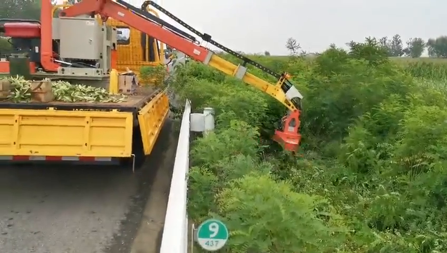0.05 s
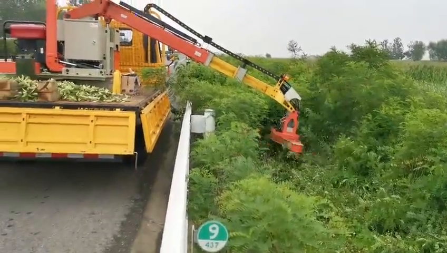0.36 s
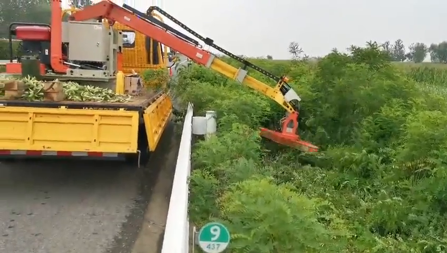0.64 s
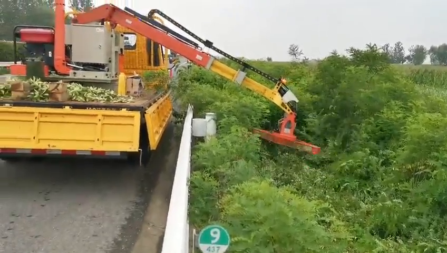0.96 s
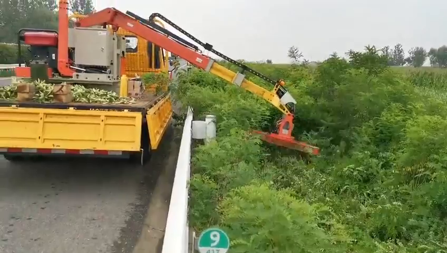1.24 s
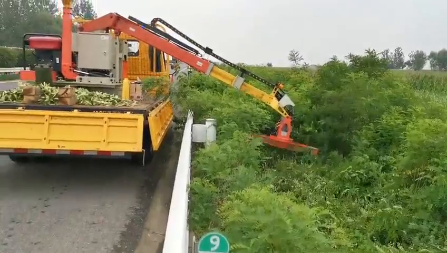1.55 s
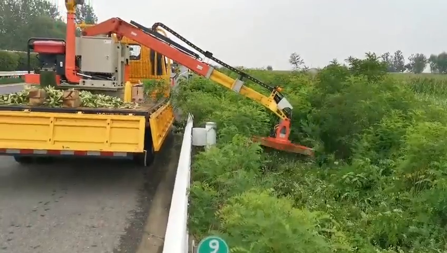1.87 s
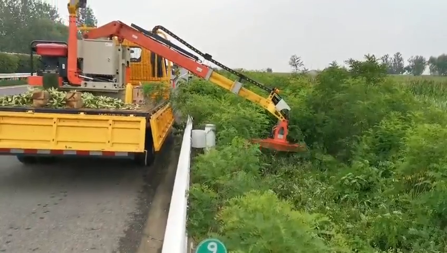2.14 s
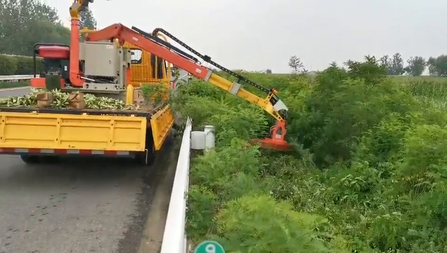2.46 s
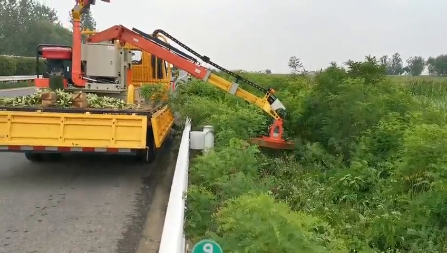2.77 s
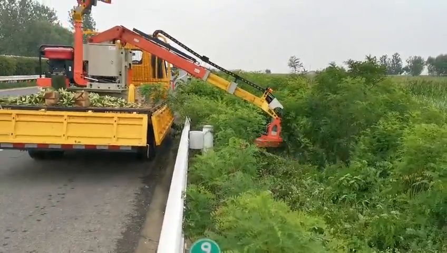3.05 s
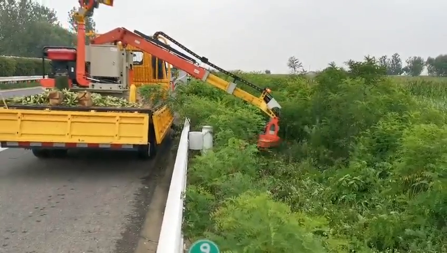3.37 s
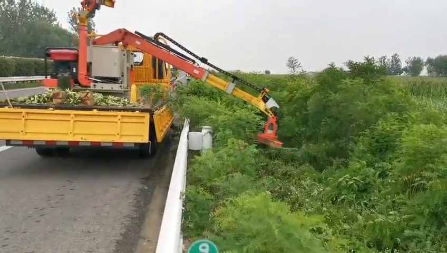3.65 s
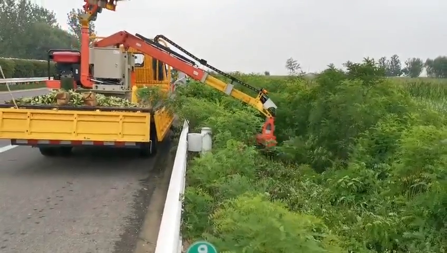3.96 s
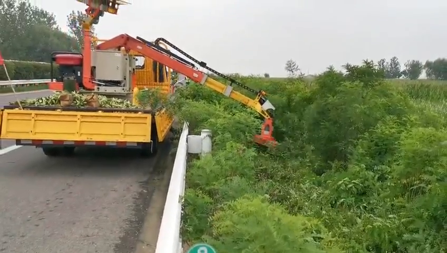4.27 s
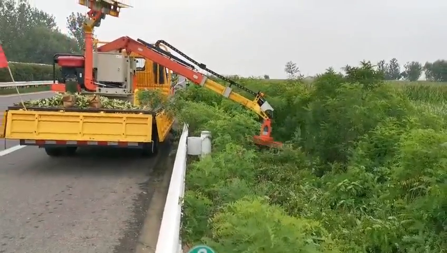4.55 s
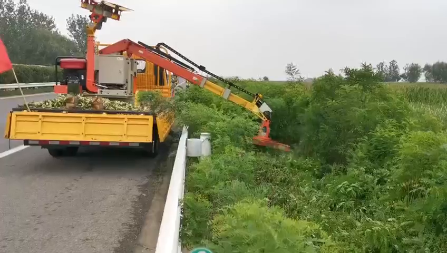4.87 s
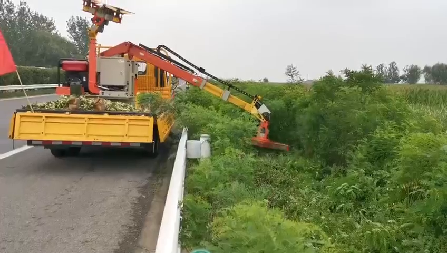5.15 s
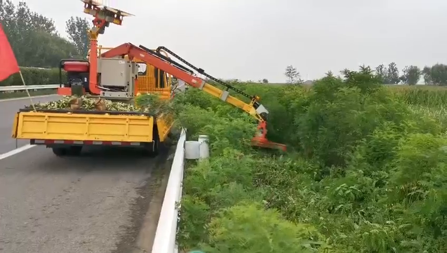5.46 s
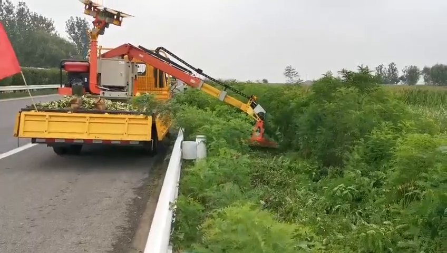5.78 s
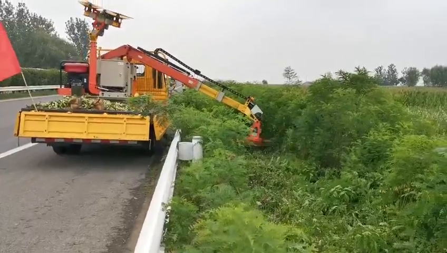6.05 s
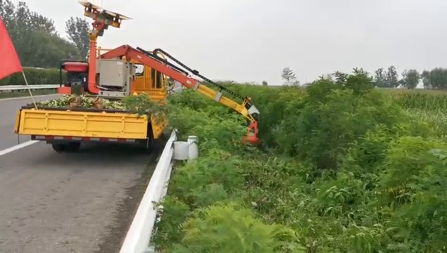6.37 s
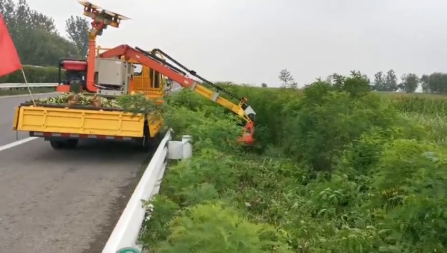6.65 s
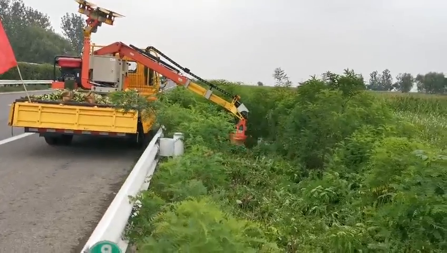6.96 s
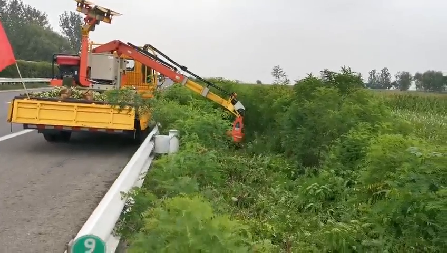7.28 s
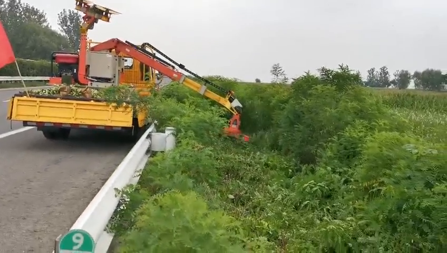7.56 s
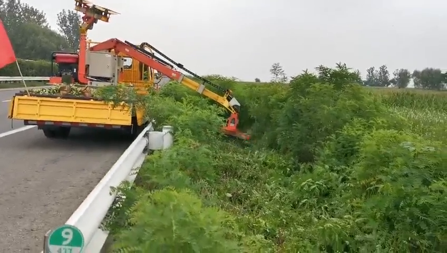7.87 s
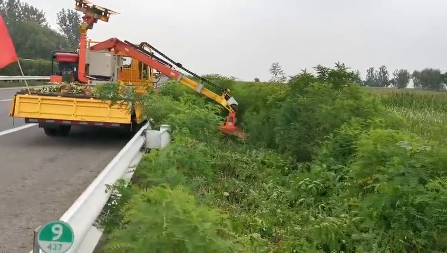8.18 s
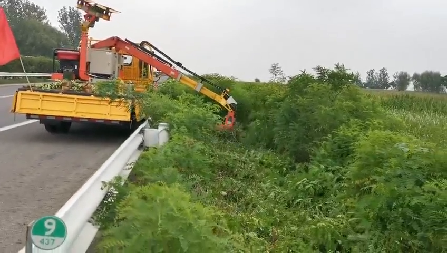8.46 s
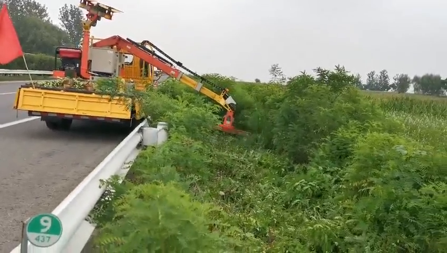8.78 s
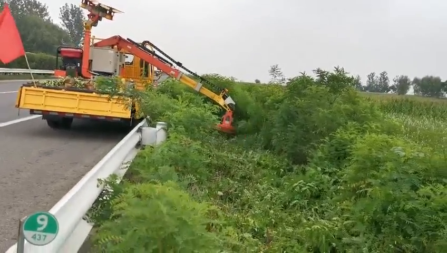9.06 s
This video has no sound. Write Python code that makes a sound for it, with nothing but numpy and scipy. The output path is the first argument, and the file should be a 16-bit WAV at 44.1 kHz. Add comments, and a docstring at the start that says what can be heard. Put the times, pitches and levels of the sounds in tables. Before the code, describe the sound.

A spinning steel blade on a truck's boom chops through roadside brush, off to the right. Its teeth rattle through twigs and shred leaves in ragged surges, the metal ringing and giving short, high squeals as stems catch. Gradually the leafy hiss thins and the cutting turns woodier and crunchier. Underneath, a single-cylinder engine thumps steadily, with a faint whine and a wash of distant road in the open air.

```python
"""A crack and a squeal, off to the right: a spinning steel blade on a truck's boom bites a roadside stem.
Its teeth rattle through twigs, shred leaves and crunch branches, and the blows set the blade ringing.
The brush comes in surges, thinning and turning woodier; stem after stem sticks on the teeth and squeals.
Underneath, a single-cylinder engine on the truck bed thumps steadily while the truck creeps away,
over a faint whine and a wash of distant road."""
import sys
import numpy as np
from scipy import signal
from scipy.fft import rfft, irfft, next_fast_len
from scipy.io import wavfile
from scipy.ndimage import uniform_filter1d

SR = 44100
rng = np.random.default_rng(int(sys.argv[2]) if len(sys.argv) > 2 else 0)


def wav_out(sig):
    """Save sig, one row per channel (or a flat mono array), as 16-bit PCM at SR to the path in sys.argv[1]."""
    wavfile.write(sys.argv[1], SR, np.round(np.clip(np.atleast_2d(sig).T, -1, 1) * 32767).astype(np.int16))


N = 402191
TIME = np.arange(N) / SR
FFT_SIZE = next_fast_len(N + 4096)
FFT_HZ = np.fft.rfftfreq(FFT_SIZE, 1 / SR)

# wash of the distant road: f/Hz, level/dB
ROAD_EQ = [(380, -6), (900, -0.5), (1600, -3.5), (16000, -17.5)]
# engine firing rate: t/s, f/Hz
FIRING_RATE = [(0, 26.25), (1.5, 26.1), (6, 26.286), (9.1, 26.6)]
# the engine's top end fades as the truck turns away, and lifts at the end: t/s, level/dB
ENGINE_TOP_FADE = [(1.4, -33.5), (2.2, -35.5), (3.7, -36), (5.2, -38.5), (8.2, -46), (9.1, -39.5)]
# the engine's deepest boom eases off: t/s, level/dB
BOOM_FADE = [(5.8, 5.5), (6.1, 2)]
# exhaust note: multiple of the firing rate, level/dB
EXHAUST_ORDERS = [(1, -64), (2, -8), (3, -7.5), (4, -19.5), (5, 6.5), (6, -0.5), (7, -15), (8, -8.5),
                  (9, -17.5), (11, -16), (36, -18.5)]
# drone of the engine casing: multiple of the firing rate, level/dB
CASING_ORDERS = [(10, -14.5), (12, -31), (13, -16.5), (15, -22.5), (16, -14.5), (18, -16), (20, -16),
                 (23, -16.5), (42, -18.5)]
# mechanical clatter of the engine: f/Hz, level/dB
CLATTER_EQ = [(200, -20), (340, -7.5), (490, -1.5), (690, -18.5), (900, -8), (1500, -23.5), (8000, -43)]
# dull knock of the engine block: f/Hz, level/dB
KNOCK_EQ = [(25, -22), (60, -4.5), (190, 1), (330, -21.5), (900, -50)]
# tufts of brush that the blade sweeps into: t/s, decay/s, level/dB
BRUSH_TUFTS = [(0.283, 0.064, 8), (0.528, 0.14, 8), (0.883, 0.13, 14.5), (1.33, 0.049, 8.5),
               (2.415, 0.12, 4), (2.964, 0.066, 12.5), (3.088, 0.074, 15.5), (3.704, 0.29, 9.5),
               (4.183, 0.56, 4.5), (4.402, 0.074, 13.5), (4.869, 0.09, 10), (5.215, 0.088, 10),
               (5.412, 0.25, 4.5), (5.673, 0.36, 5.5), (6.16, 0.11, 7.5), (6.345, 0.055, 5),
               (6.502, 0.1, 9.5), (6.72, 0.38, 2.5), (7.078, 0.11, 5), (7.297, 0.097, 3.5),
               (7.432, 0.11, 5.5), (8.146, 0.16, 2.5), (8.942, 0.16, 4)]
# gaps between bushes, where the blade briefly runs free: t/s, drop in feed/dB
BRUSH_GAPS = [(1.129, 3.5), (1.92, 7), (3.37, 2), (5.06, 7.5), (5.66, 4.5), (7.62, 0.5), (8.08, 7.5)]
# tearing leaves: f/Hz, level/dB
TEAR_EQ = [(1500, -10), (4000, 4.5), (7600, 7), (8500, -6.5), (11000, 1), (13500, -2), (15800, -7.5)]
# dull crunch of woody branches: f/Hz, level/dB
CRUNCH_EQ = [(400, -15), (1000, -7.5), (1800, -12), (2400, 1), (2900, -2), (3800, -10), (9000, -42)]
# crack of teeth on wood: f/Hz, level/dB
CRACK_EQ = [(300, -60), (1000, -36), (2000, -30), (2550, -14.5), (3100, -1.5), (3400, 3.5), (3950, 5),
            (4700, -6.5), (6100, -7), (7600, -13), (16000, -33.5)]
# ringing modes of the blade: f/Hz, level/dB
BLADE_MODES = [(3282, -1), (3420, 2), (3792, 2.5), (3945, 5.5), (4282, 3), (4488, -1), (4795, -3),
               (5305, 1.5), (5830, -0.5), (6440, -6.5)]
# branches that rub along the blade and hold one mode singing: t/s, length/s, f/Hz
BRANCH_RUBS = [(1.22, 0.18, 4795), (1.424, 0.3, 4282), (1.743, 0.078, 5305), (2.717, 0.14, 5305),
               (3.41, 0.071, 5305), (4.116, 0.14, 4282), (5.02, 0.096, 5305), (5.03, 0.091, 3792),
               (5.712, 0.26, 5305), (6.323, 0.14, 3792), (6.69, 0.2, 4282), (6.747, 0.2, 5830),
               (7.933, 0.067, 5830)]
# stems that squeal as the blade bites through: t/s, decay/s, f/Hz, level/dB
STEM_BITES = [(0.01, 0.052, 4380, -19), (0.312, 0.061, 3290, -19), (0.364, 0.03, 3780, -19),
              (0.453, 0.024, 4400, -19), (0.495, 0.087, 5840, -19), (0.623, 0.019, 3800, -19),
              (0.703, 0.032, 3470, -17), (0.967, 0.048, 3790, -18.5), (1.388, 0.022, 3790, -16),
              (1.411, 0.07, 4020, -18.5), (1.633, 0.042, 3920, -16), (2.332, 0.041, 3900, -15),
              (2.641, 0.034, 3610, -22.5), (2.943, 0.016, 2780, -27.5), (3.265, 0.017, 3870, -16),
              (3.482, 0.028, 3440, -19), (3.558, 0.064, 3295, -19), (3.763, 0.033, 3880, -19),
              (3.968, 0.024, 3310, -22.5), (4.209, 0.033, 3790, -18.5), (4.535, 0.062, 3930, -18),
              (4.583, 0.032, 5750, -21), (4.675, 0.011, 3980, -16), (4.806, 0.027, 3480, -17),
              (5.166, 0.012, 3950, -14), (5.221, 0.05, 3360, -21), (5.583, 0.013, 3320, -19),
              (5.89, 0.031, 3230, -23.5), (5.945, 0.016, 3480, -16.5), (6.015, 0.04, 3820, -16),
              (6.222, 0.017, 3766, -14), (6.524, 0.053, 3430, -19.5), (6.904, 0.023, 3990, -19),
              (7.088, 0.053, 4440, -21), (7.168, 0.085, 3430, -18.5), (7.324, 0.024, 3974, -19),
              (7.482, 0.054, 3860, -19), (7.813, 0.023, 3920, -22), (8.185, 0.042, 3870, -19),
              (8.484, 0.05, 3520, -17), (8.651, 0.091, 3800, -21), (8.796, 0.028, 3750, -16),
              (8.952, 0.0084, 3970, -16)]
# the left side lies in the shadow of the microphone housing: f/Hz, level/dB against the right
LEFT_SHADOW = [(400, 0), (2100, -2), (2800, -3), (3300, -18.5), (4200, -11.5), (5900, -15.5), (7500, -11),
               (8500, -0.5), (9300, 3), (11400, -3)]
# the left side hears the truck a little early: f/Hz, phase lead/rad
LEFT_LEAD = [(100, 0.076), (800, 0.44), (1400, 1.52)]


def amp(db):
    """Decibels to gain."""
    return 10 ** (np.asarray(db) / 20)


def unit(x):
    """Scales to rms 1."""
    return x / np.sqrt(np.mean(abs(x) ** 2) + 1e-20)


def over_time(rows):
    """Joins rows (t/s, value) by straight lines."""
    return np.interp(TIME, *np.transpose(rows))


def over_frequency(rows):
    """Joins rows (f/Hz, value) on a log-frequency axis."""
    hz, value = np.transpose(rows)
    return np.interp(np.log(FFT_HZ + 1), np.log(hz + 1), value)


def filtered(x, response):
    """Applies a frequency response."""
    return irfft(rfft(x, FFT_SIZE) * response, FFT_SIZE)[..., :N]


def coloured(x, eq):
    """Shapes x with an EQ curve, at rms 1."""
    return unit(filtered(x, amp(over_frequency(eq))))


def wander(per_s):
    """Smooth random modulation of rms 1, heading for a new value per_s times a second."""
    knots = rng.standard_normal(N // 20)
    path = np.interp(TIME * per_s, np.arange(len(knots)), knots)
    return unit(uniform_filter1d(path, max(int(SR / per_s / 2), 1)))


def noise(alike):
    """Stereo white noise, from wide (alike=0) to mono (alike=1)."""
    left, right = rng.standard_normal((2, N))
    return np.array([alike * right + np.sqrt(1 - alike ** 2) * left, right])


def impacts(per_s, spread_db, alike):
    """A stereo crackle of tiny random blows, uneven in size."""
    size = amp(spread_db * np.minimum(rng.exponential(1, N), 2.5))
    struck = rng.random(N) < per_s / SR
    return unit(size * struck * noise(alike))


def road(db=-38.5):
    """A faint bed of tyres and open air."""
    return amp(db + 0.5 * wander(per_s=2.57)) * coloured(noise(alike=0.81), ROAD_EQ)


def whine(hz=804, db=-51.5, waver=0.00892):
    """A faint, unsteady whine, likely the hydraulic pump."""
    pitch = hz * (1 + waver * wander(per_s=45))
    return amp(db) * unit(np.sin(2 * np.pi * np.cumsum(pitch) / SR))


def engine_note(firings, top_db, pipe_ring=0.18, scatter_rad=0.6):
    """Each firing thumps down the exhaust and makes the casing drone."""
    orders = np.arange(1, CASING_ORDERS[-1][0] + 1)
    gains = amp(np.interp(orders, *np.transpose(sorted(EXHAUST_ORDERS + CASING_ORDERS))))
    # the pipe rings on after each pulse, and reflections scatter the phase of the upper orders
    mirrored_log_gains = np.log(np.r_[gains[0], gains, gains[-2::-1]])
    lags = pipe_ring * signal.hilbert(mirrored_log_gains).imag[1:len(gains) + 1]
    lags += scatter_rad * rng.standard_normal(len(gains)) * (orders > 8)
    partials = {k: -gain * np.cos(2 * np.pi * k * firings - lag)
                for k, gain, lag in zip(orders, gains, lags)}
    pipe = [partials[k] for k, _ in EXHAUST_ORDERS]
    boom = sum(pipe[:2]) * amp(over_time(BOOM_FADE))
    thump = sum(pipe[2:]) * amp(0.7 * wander(per_s=20))
    drone = sum(partials[k] for k, _ in CASING_ORDERS) * amp(top_db - top_db.mean())
    return unit(boom + thump + drone)


def engine(note_db=-27.5, clatter_trim_db=-4.0, knock_db=-42.0, uneven=0.00095, first_firing_s=0.00602):
    """One cylinder sounds the engine note and shakes clatter and knock from the block at each firing."""
    firing_hz = over_time(FIRING_RATE) * (1 + uneven * wander(per_s=14))
    firings = np.cumsum(firing_hz) / SR - first_firing_s * FIRING_RATE[0][1]
    top_db = over_time(ENGINE_TOP_FADE)
    note = engine_note(firings, top_db)
    bursts = 1 + 1.25 * np.exp(-(firings % 1) / 0.065)
    clatter = coloured(bursts * noise(alike=0.85), CLATTER_EQ)
    knock = coloured(bursts * noise(alike=0.85), KNOCK_EQ)
    return amp(note_db) * note + amp(clatter_trim_db + top_db) * clatter + amp(knock_db) * knock


def brush_feed(leaves_db=9.3, thinning_db_per_s=1.32, grab_s=0.008, gap_s=0.049,
               sprig_db=4, sprig_s=0.027, woody_below_hz=4100):
    """How much brush meets the blade, in dB about its mean: thinning loose leaves, surges and gaps."""
    power = amp(leaves_db - thinning_db_per_s * TIME) ** 2
    # a woody stem drags in its own sprig of leaves
    sprigs = [(start, sprig_s, leaves_db - thinning_db_per_s * start + sprig_db)
              for start, _, hz, _ in STEM_BITES if hz < woody_below_hz]
    for start, decay_s, level_db in BRUSH_TUFTS + sprigs:
        age = np.maximum(TIME - start, 0)
        surge = amp(level_db) * (1 - np.exp(-age / grab_s)) * np.exp(-(age / decay_s) ** 2)
        power += surge ** 2
    dips_db = sum(drop_db * np.exp(-((TIME - when) / gap_s) ** 2) for when, drop_db in BRUSH_GAPS)
    feed_db = 10 * np.log10(power) - dips_db
    return feed_db - feed_db.mean()


def treble_pings(per_pitch_per_s=27, ring_s=0.014, low_hz=6470):
    """Short random pings in the octave above low_hz, adding sparkle to the leaf spray."""
    pings = np.zeros((2, N))
    for hz in low_hz * 2 ** rng.random(size=28):
        pole = np.exp((2j * np.pi * hz - 1 / ring_s) / SR)
        ticks = impacts(per_pitch_per_s, spread_db=2.0, alike=0.18)
        pings += signal.lfilter([1], [1, -pole], ticks).real
    return unit(pings)


def leaf_shred(feed_db, woody_db, db=-30.5, pings_db=-4.5, ragged_db=2.5):
    """Leaves tear in a wide, fine spray dotted with high pings; it eases slightly in woodier growth."""
    spray = impacts(per_s=24000, spread_db=3.0, alike=0) + amp(pings_db) * treble_pings()
    level_db = db + 0.89 * feed_db - 0.021 * woody_db + ragged_db * wander(per_s=23)
    return amp(level_db) * coloured(spray, TEAR_EQ)


def branch_crunch(feed_db, woody_db, db=-49.0, ragged_db=2.5):
    """Branches splinter lower than twigs, and come forward as the growth gets woodier."""
    level_db = db + 0.5 * feed_db + 2.15 * woody_db + ragged_db * wander(per_s=35)
    return amp(level_db) * coloured(impacts(per_s=6000, spread_db=3.0, alike=0.38), CRUNCH_EQ)


def teeth_rattle(feed_db, woody_db, db=-24.5, ragged_db=4.0):
    """Teeth snap through twigs in ragged clumps."""
    clumps = unit(amp(ragged_db * np.minimum(wander(per_s=150), 1)))
    cracks = coloured(impacts(per_s=7000, spread_db=1.0, alike=1.0), CRACK_EQ)
    return amp(db + feed_db + woody_db) * clumps * cracks


def blade_ring(feed_db, woody_db, db=-18.0, width_hz=20.7, low_modes_hz=4100,
               spin_hz=43, swing=0.0066, bend=0.004, shimmer_db=3.5, rub_db=5.0):
    """Blows ring the blade; spin swings each mode's pitch, and the moving contact bends it."""
    blows = impacts(per_s=2500, spread_db=1.0, alike=1.0) * amp(0.64 * feed_db)
    spin_phase = 2 * np.pi * np.cumsum(spin_hz * (1 + 0.14 * wander(per_s=6.4))) / SR
    rub_swells = np.zeros((len(BLADE_MODES), N))
    for start, length, hz in BRANCH_RUBS:
        nearest = np.argmin([abs(mode_hz - hz) for mode_hz, _ in BLADE_MODES])
        rub_swells[nearest] += np.sqrt(np.maximum(1 - (2 * (TIME - start) / length - 1) ** 2, 0))
    steel = np.zeros((2, N))
    for (hz, mode_db), rub in zip(BLADE_MODES, rub_swells):
        pole = np.exp((2j * hz - width_hz) * np.pi / SR)
        # wood drives the low modes harder
        contact_db = shimmer_db * wander(per_s=19) + 0.43 * woody_db * (hz < low_modes_hz)
        ring = unit(signal.lfilter([1], [1, -pole], blows * amp(contact_db)))
        ring += rub * amp(rub_db) * np.exp(2j * np.pi * hz * TIME)  # steady friction makes it sing
        doppler = swing * hz / spin_hz * np.sin(spin_phase + 2 * np.pi * rng.random())
        bending = 2 * np.pi * np.cumsum(bend * hz * wander(per_s=9)) / SR
        steel += amp(mode_db) * (ring * np.exp(1j * (doppler + bending))).real
    return amp(db) * unit(steel)


def stem_squeals(squeal_db=5.5, crack_db=1.5, flutter_db=3.5, jitter=0.024, glide=0.017,
                 attack_s=0.00053, settle_s=0.039, thick_hz=3500):
    """A stem sticks and slips on the teeth, making one mode squeal; thick ones sit low and crack hard."""
    drift = jitter * wander(per_s=280)
    flutter = amp(flutter_db * wander(per_s=380))
    crack = coloured(impacts(per_s=6500, spread_db=-0.5, alike=0.96), CRACK_EQ)
    bites = np.zeros((2, N))
    for start, decay_s, hz, level_db in STEM_BITES:
        span = np.arange(int(start * SR), min(int((start + 2 * decay_s) * SR), N))
        age = (span - span[0]) / SR
        envelope = (1 - np.exp(-age / attack_s)) * np.exp(-(age / decay_s) ** 2)
        thickness = min(thick_hz / hz, 1.15) ** 2
        unsteady = thickness / (1 + decay_s / settle_s)  # a long squeal locks onto its mode
        direction = np.sign(hz - thick_hz)  # thick stems drag the pitch down, thin ones let it rise
        sweep = glide * direction * (2 * age / decay_s - 1)
        pitch = hz * (1 + unsteady * (drift[span] + sweep))
        squeal = unit(np.sin(2 * np.pi * np.cumsum(pitch) / SR) * flutter[span])
        bite = amp(squeal_db) * squeal + amp(crack_db) * thickness * crack[:, span]
        bites[:, span] += amp(level_db) * envelope * bite
    return bites


def scene(woodier_db_per_s=1.63):
    """The blade works from leafy tops down into woodier growth, over a bed of engine, whine and road."""
    feed_db = brush_feed()
    woody_db = woodier_db_per_s * (TIME - TIME.mean())
    wood = teeth_rattle(feed_db, woody_db) + branch_crunch(feed_db, woody_db)
    steel = blade_ring(feed_db, woody_db) + stem_squeals()
    leaves = leaf_shred(feed_db, woody_db)
    return wood + steel + leaves + engine() + whine() + road()


def record(dry, ceiling=0.9, high_cut_hz=15850):
    """Shades and advances the left side, soft-clips the tallest peaks and cuts the extreme top."""
    left_response = amp(over_frequency(LEFT_SHADOW)) * np.exp(1j * over_frequency(LEFT_LEAD))
    heard = np.array([filtered(dry[0], left_response), dry[1]])
    heard /= (1 + (heard / ceiling) ** 8) ** (1 / 8)
    high_cut = signal.firwin(511, high_cut_hz, window=("kaiser", 9), fs=SR)
    return signal.oaconvolve(heard, high_cut[None], "same")


dry = scene()
out = record(dry)
wav_out(out)
```